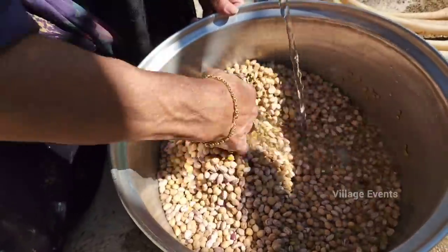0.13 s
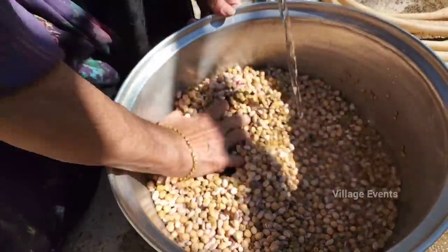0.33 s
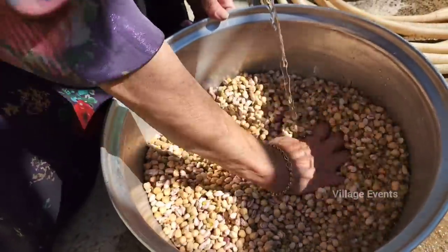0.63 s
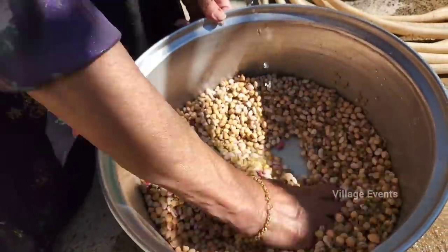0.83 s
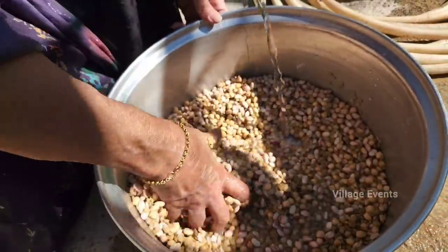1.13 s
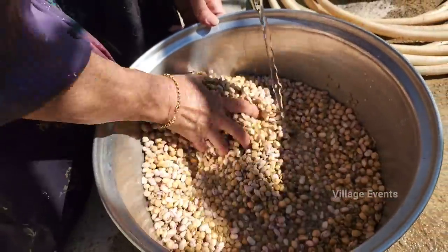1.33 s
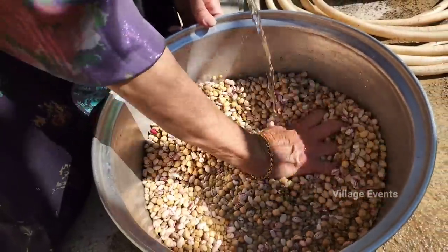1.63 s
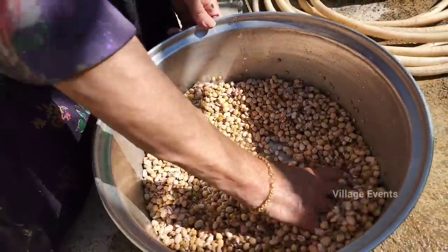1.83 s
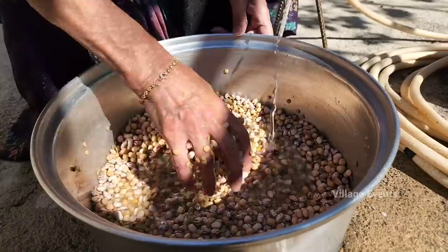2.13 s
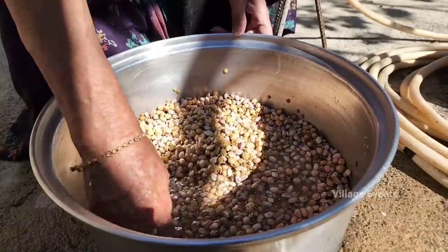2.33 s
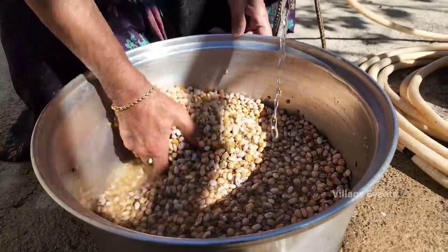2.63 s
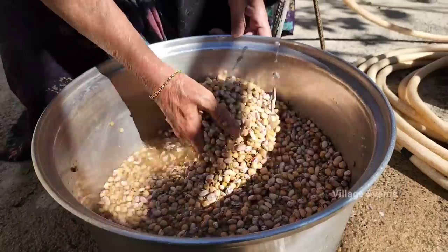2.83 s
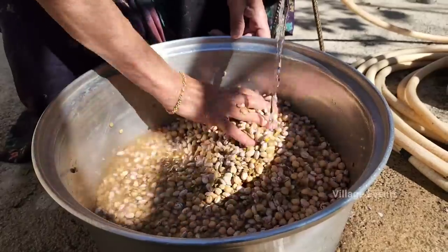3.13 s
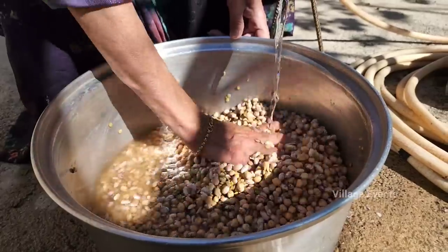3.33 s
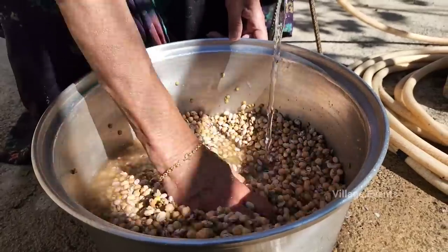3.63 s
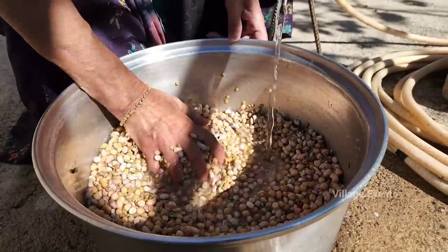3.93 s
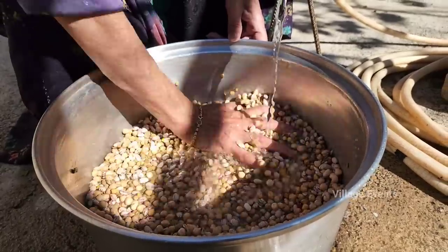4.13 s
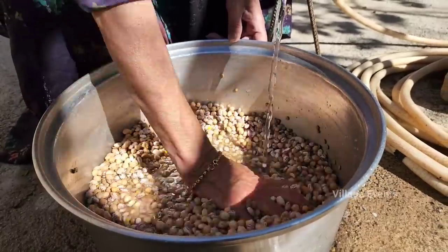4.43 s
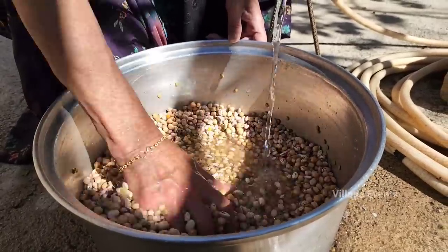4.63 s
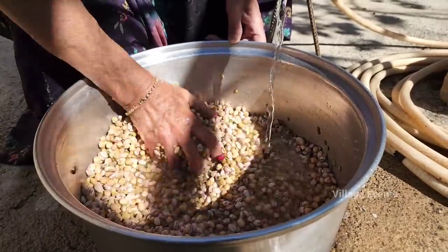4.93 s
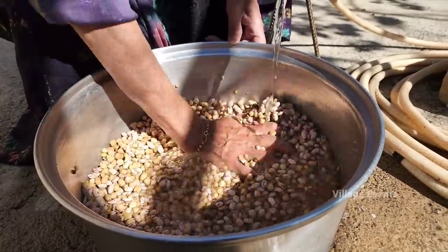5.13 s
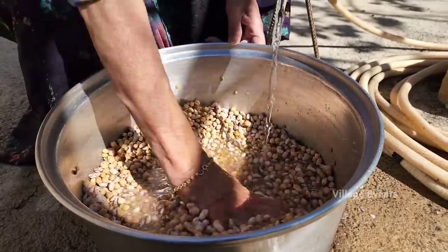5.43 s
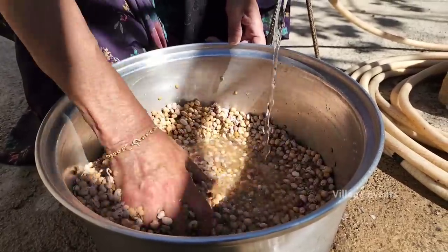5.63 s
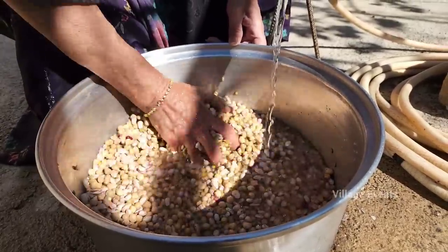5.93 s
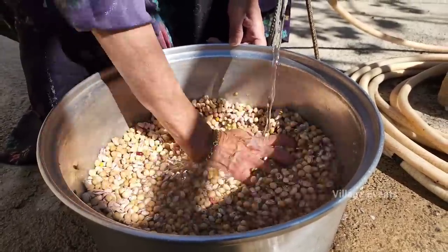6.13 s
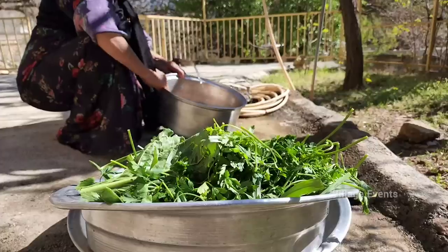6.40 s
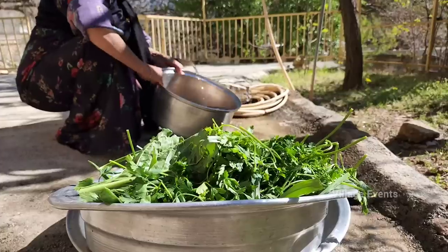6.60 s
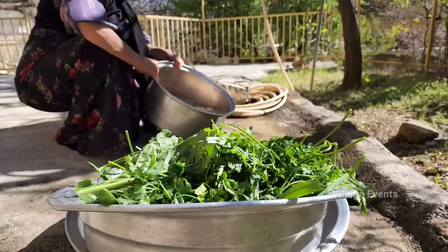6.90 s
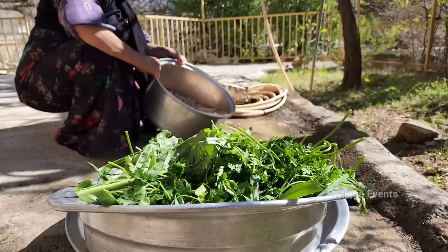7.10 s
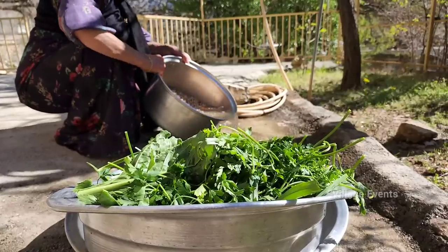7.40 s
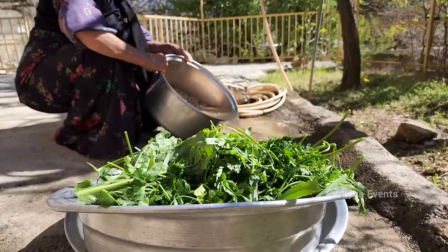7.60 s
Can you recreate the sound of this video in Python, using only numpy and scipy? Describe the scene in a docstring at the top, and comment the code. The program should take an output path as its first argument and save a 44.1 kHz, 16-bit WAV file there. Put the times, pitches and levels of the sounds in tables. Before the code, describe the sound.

Close outdoor sound of wet beans being stirred by hand in a wide metal pot while water falls in. Bright clacks, sharp splats and bubbling come in irregular sweeps. Around two seconds the position changes and the slosh turns more hollow and gurgling. After six seconds, farther away and much quieter, the pot bumps dully on stone with scrape, trickle and drips.

```python
"""Stirring wet beans in a metal pot

A hand stirs dried beans in a wide metal pot while a hose stream falls on them, heard close from two places in turn:
clumped random contacts make the churn and clack, rising damped sines the bubbles, scattered cracks the splats.
Then, from further off, the pot is dragged and tipped on stone: decaying modes give dull knocks, with scrape,
trickle and drips. A light breeze, slow-swelling low noise, buffets the two microphone ports."""
import sys
import numpy as np
from scipy import signal
from scipy.fft import rfft, irfft, next_fast_len
from scipy.io import wavfile
from scipy.ndimage import map_coordinates

SR = 44100
rng = np.random.default_rng(int(sys.argv[2]) if len(sys.argv) > 2 else 0)


def master_out(mix):
    """Clip the mix to full scale and print it as 16-bit PCM to the path in sys.argv[1]."""
    frames = np.transpose(np.atleast_2d(mix))
    ceiling = np.clip(frames, -1, 1)
    pcm = np.round(ceiling * 32767).astype(np.int16)
    wavfile.write(sys.argv[1], SR, pcm)


def volts(x):
    """Linear amplitude factor 10**(x/20) for a level x in dB, scalar or array-like."""
    e = np.asarray(x, float) / 20
    return 10 ** e


N = 342216

# steady stirring, one table for each near place: (time [s], churn level [dB], clack level [dB])
STIRRING_LEVELS = [
    [(0.0, -24, -25.5), (0.2, -29.5, -25.5), (0.4, -25, -27), (0.53, -20, -29), (0.78, -28, -29),
     (0.98, -30, -29.5), (1.3, -24, -18), (1.62, -23.5, -21.5), (1.77, -23, -24), (1.83, -26.5, -25.5),
     (2.022, -29, -26)],
    [(2.026, -37.5, -39), (2.21, -33, -31), (2.33, -46, -41.5), (2.345, -34, -27.5), (2.5, -28, -27.5),
     (2.65, -33.5, -34), (2.74, -29.5, -27), (3.12, -30, -26.5), (3.23, -24, -30), (3.31, -29, -33),
     (3.43, -22.5, -23.5), (3.56, -27.5, -29.5), (3.91, -31, -32.5), (4.16, -24.5, -26), (4.47, -28, -28),
     (4.78, -29, -33), (4.86, -26.5, -28.5), (5.04, -29, -26), (5.16, -22, -25), (5.26, -28.5, -28.5),
     (5.78, -29, -29.5), (6.17, -23.5, -26)],
]
# handfuls of beans tumbling through the stream:
# (start [s], time from start to the fall [s], clack level [dB], spray level [dB])
TUMBLES = [(0.065, 0.027, -26, -32), (0.23, 0.016, -22, -27), (0.265, 0.074, -16.5, -18.5),
           (0.57, 0.097, -20, -26.5), (1.358, .03, -27.5, -23.5), (1.463, 0.044, -16.5, -22),
           (1.647, .02, -28, -29), (1.736, 0.025, -29.5, -30.5), (2.332, .03, -21.5, -28),
           (2.421, .04, -25, -27.5), (2.518, 0.032, -22, -25), (3.09, .06, -35, -27),
           (3.162, 0.035, -17, -20), (4.046, 0.034, -20, -24), (4.113, 0.082, -22.5, -27),
           (4.696, 0.04, -24.5, -38.5), (4.827, .12, -33, -42.5), (5.062, 0.084, -20.5, -28.5),
           (5.828, 0.057, -25, -35.5), (6.052, .03, -27, -43.5)]
# colour of bean on bean: (frequency [Hz], level [dB])
CLACK_COLOUR = [(700, -28), (1800, -10.5), (3000, -3), (4200, 0), (5300, -3.5), (6200, -5.5), (9000, -9.5),
                (16000, -38)]
# colour of flung water: (frequency [Hz], level [dB])
SPRAY_COLOUR = [(1500, -28.5), (4000, -23.5), (6500, 6), (8800, 2), (11000, 8), (15600, 5), (16100, -37.5)]
# resonances of the pot's wall: (frequency [Hz], width [Hz], boost [dB])
WALL_RESONANCES = [(810, 140, 10.5), (1240, 140, 10), (1864, 105, 11.5), (2250, 150, 9.5)]


def unit(x):
    """Scaled to rms 1."""
    return x / np.sqrt(np.mean(x ** 2) + 1e-20)


def along(points, hz):
    """(Hz, value) points read on a log frequency axis."""
    f, v = np.transpose(points)
    return np.interp(np.log(hz + 1), np.log(f + 1), v)


def gains(rows):
    """One gain per sample for each dB column, silent outside the table."""
    s, *columns = np.transpose(rows)
    t = np.arange(N) / SR
    return [volts(np.interp(t, s, column, left=-140, right=-140)) for column in columns]


def wobble(rate):
    """A smooth random curve, rate knots a second."""
    knots = rng.standard_normal(int(N * rate / SR) + 4)
    return map_coordinates(knots, [np.arange(N) * rate / SR])


def coloured(x, spectrum, peaks=()):
    """x through a causal minimum-phase filter with this spectrum and these resonant boosts."""
    m = 2 ** 14
    hz = np.fft.rfftfreq(m, 1 / SR)
    boost_db = sum(db / (1 + (2 * (hz - centre) / width) ** 2) for centre, width, db in peaks)
    level_db = along(spectrum, hz) + boost_db
    # folding the cepstrum forward in time makes the response causal
    cepstrum = irfft(np.log(volts(level_db) + 1e-6), m)
    cepstrum[1:m // 2] *= 2
    cepstrum[m // 2 + 1:] = 0
    response = irfft(np.exp(rfft(cepstrum)), m)
    size = next_fast_len(N + m, True)
    return irfft(rfft(x, size) * rfft(response, size), size)[..., :N]


def placed(start, size, spread_s):
    """Impulses from all over the pot: each reaches one port a little before the other."""
    half_lag = rng.standard_normal(len(start)) * spread_s * SR / 2
    at = np.clip(np.round(start * SR + np.outer([1, -1], half_lag)).astype(int), 0, N - 1)
    return np.array([np.bincount(port, size, N) for port in at])


def rattling(hits, t60, share):
    """Hits plus the quick scatter of their sound round the pot wall, new for every hit."""
    keep = volts(-120 / SR / t60)  # power kept per sample, -60 dB after t60 seconds
    power = signal.lfilter([1 - keep], [1, -keep], hits ** 2)
    return hits + share * np.sqrt(power) * rng.standard_normal((2, N))


def patter(count, scatter_db, clump_db, spread_s):
    """Many small contacts of very unequal size that come in clumps."""
    when, size, sign = rng.random((3, count))
    strength = volts(-scatter_db * np.log(size)) * np.sign(sign - .5)
    hits = placed(when * N / SR, strength, spread_s)
    return hits * volts(clump_db * (wobble(12) + 0.45 * wobble(45) + 1.5 * wobble(150)))


def bubbles(start, hz, db, cycles, spread_s):
    """Damped sines whose pitch rises as the bubble nears the surface."""
    t = np.arange(int(2.5 * cycles * SR / np.percentile(hz, 15))) / SR
    u = hz[:, None] * t / cycles
    tone = np.sin(2 * np.pi * cycles * (u + .03 * u * u))
    envelope = np.exp(-2 * u) * (1 - np.exp(-14 * u))
    song = volts(db)[:, None] * tone * envelope
    half_lag = rng.standard_normal(len(start)) * spread_s * SR / 2
    first = np.round(start * SR + np.outer([1, -1], half_lag)).astype(int).clip(0)
    at = first[..., None] + np.arange(len(t))
    return np.array([np.bincount(port.ravel(), song.ravel(), N + SR)[:N] for port in at])


def swarm(rows, count, spread, cycles):
    """Dense bubbles round one size, which drifts with the hand and the water level."""
    s, hz, db = np.transpose(rows)
    when = rng.uniform(s[0], s[-1], count)
    pitch, size = rng.standard_normal((2, count))
    scattered_hz = np.interp(when, s, hz) * np.exp(spread * pitch)
    pops = bubbles(when, scattered_hz, 2.8 * size, cycles, spread_s=.0002)
    active_share = (s[-1] - s[0]) * SR / N  # keeps the rms right within the active stretch
    return gains(np.transpose([s, db]))[0] * unit(pops) * np.sqrt(active_share)


def breeze():
    """Air tumbling over the ports, unrelated left and right; each gust strikes from one side."""
    # steady wind on both ports: (time [s], level [dB])
    wind = [(0.0, -66), (0.5, -56), (1.95, -50), (2.1, -76), (3.3, -62), (4.5, -71), (6.1, -64),
            (7.0, -66.5), (7.13, -72), (7.76, -75.5)]
    # (time [s], peak level [dB], left minus right [dB])
    gusts = [(0.24, -48.5, -27), (0.46, -48.5, 17), (1.02, -46, -25.5), (1.38, -50.5, -13.5),
             (1.66, -49.5, -27), (1.88, -48, -25), (1.98, -53, -17), (3.5, -53.5, -22),
             (4.12, -46.5, -23.5), (4.88, -57.5, -17), (6.22, -59, -11)]
    # colour of the buffeting: (frequency [Hz], level [dB])
    buffet_colour = [(11, -46), (18, -21.5), (49, 4), (97, -5), (151, -21.5), (200, -9.5), (260, -54.5),
                     (440, -120)]
    swell_db_per_s = 158.5  # rise and fade of a gust
    power, t = gains(wind)[0] ** 2, np.arange(N) / SR
    for s, db, pan_db in gusts:
        sides_db = np.array([[pan_db / 2], [-pan_db / 2]])
        power = power + volts(db - swell_db_per_s * np.abs(t - s) + sides_db) ** 2
    lumps = volts(1.8 * np.array([wobble(11), wobble(4)]))
    rumble = coloured(rng.standard_normal((2, N)), buffet_colour, [(52, 25, 6.7)])
    return np.sqrt(power) * unit(lumps * rumble)


def far_pot():
    """Between knocks the pot scrapes; water runs over its rim and drips into quiet air."""
    # (time [s], scrape level [dB], trickle level [dB])
    far_levels = [(6.172, -39, -55), (6.228, -38, -45), (6.37, -53, -57), (6.498, -40, -47.5),
                  (6.738, -42.5, -49), (6.87, -51, -52.5), (7.012, -47, -67), (7.082, -66, -67),
                  (7.6, -68.5, -71), (7.71, -69, -63), (7.76, -72, -70)]
    # colours of the scrape, the trickle and the quiet air: (frequency [Hz], level [dB])
    scrape_colour = [(24, -50), (40, -8.5), (215, -4), (267, -13.5), (306, -1), (417, -4.5), (616, -16.5),
                     (686, -31.5), (1000, -17), (1300, -48), (2200, -120)]
    trickle_colour = [(350, -19.5), (600, -0.5), (1070, -19), (2270, -4.5), (3080, -10.5), (4400, -8),
                      (5790, -11), (9620, -14.5), (15100, -11.5), (16000, -31)]
    yard_colour = [(150, -33.5), (250, -3.5), (336, 0.5), (597, -7), (1080, -19.5), (2530, -7), (3170, -13),
                   (4410, -10), (9490, -15), (15200, -10), (16000, -15)]
    # (time [s], bubble level [dB], bubble pitch at its start [Hz])
    drips = [(6.2774, -44, 1750), (6.429, -27, 4690), (6.8607, -30.5, 4300), (6.8985, -33, 1840),
             (7.0133, -35.5, 7360), (7.029, -38, 3170), (7.3352, -45, 2580), (7.402, -43.5, 4430),
             (7.6086, -45.5, 3820), (7.6296, -50.5, 1710), (7.6882, -39, 5340), (7.7069, -37.5, 4940),
             (7.7444, -41, 3340)]
    yard_db, tick_db = -60.5, 9.5  # quiet air; drive of a drip's tick over its bubble level
    scrape_gain, trickle_gain = gains(far_levels)
    scrape = patter(count=30000, scatter_db=2, clump_db=.5, spread_s=.0005)
    drops = patter(count=5000, scatter_db=3.5, clump_db=1.0, spread_s=.0004)
    trickle = rattling(drops, t60=.02, share=1.4)
    steady = scrape_gain * unit(coloured(scrape, scrape_colour))
    steady = steady + trickle_gain * unit(coloured(trickle, trickle_colour, WALL_RESONANCES))
    specks = patter(count=30000, scatter_db=2.8, clump_db=.5, spread_s=.001)
    yard = volts(yard_db) * unit(coloured(specks, yard_colour))
    s, db, hz = np.transpose(drips)
    tick_hits = placed(s, volts(db + tick_db), 0.00016)
    tick = coloured(rattling(tick_hits, t60=.035, share=3.5), CLACK_COLOUR)
    return steady + yard + bubbles(s, hz, db, cycles=12, spread_s=0.00022) + tick


def ring(modes, t):
    """One blow: every mode decays by its t60, at a new strength and a slightly new pitch."""
    return sum(volts(db + rng.normal(0, 1.15) - 60 * t / t60) * np.sin(2 * np.pi * hz * (1 + 0.029 * rng.normal()) * t)
               for hz, db, t60 in modes)


def knocks():
    """The heavy pot meets stone softly: a hollow body, a thud, a blurred rattle of the wall and a snap of grit."""
    # (time [s], blow level [dB], thud relative to the blow [dB], wall drive [dB], crushed grit drive [dB])
    bumps = [(6.18, -22.5, -22, -29, -45), (6.217, -16, -16.5, -32, -28.5), (6.287, -38, -12, -40, -45),
             (6.313, -25, -18, -37.5, -45), (6.37, -35, -18, -34.5, -47), (6.408, -29, -10, -36.5, -27),
             (6.434, -18, -22, -30.5, -33), (6.515, -15.5, -15, -30.5, -40), (6.542, -14.5, -20, -31, -32),
             (6.579, -12.5, -20, -28, -40), (6.615, -14.5, -15.5, -29.5, -30.5),
             (6.68, -18, -13.5, -26, -35), (6.748, -23.5, -15, -31.5, -37),
             (6.791, -24, -5.5, -31.5, -30.5), (6.831, -22, -20, -28.5, -34), (6.9, -43, 1, -38, -34),
             (6.941, -34.5, -4, -44.5, -48), (6.976, -26, -9, -39.5, -36.5),
             (7.003, -33.5, -15, -45.5, -37), (7.05, -49, -10, -54, -50)]
    # modes of the pot's body: (mean frequency [Hz], mean level [dB], t60 [s])
    hollow_modes = [(366, 6.5, 0.044), (419.3, -1, 0.075), (582, -11.5, 0.079)]
    # modes of its weight on the ground: (mean frequency [Hz], mean level [dB], t60 [s])
    thud_modes = [(75.4, 2.5, 0.099), (124.4, 3, 0.1), (211.3, 1.5, 0.18)]
    body, t = np.zeros(N + SR), np.arange(SR // 5) / SR
    soft_onset = (1 - np.exp(-t / 0.0039)) ** 2
    for s, db, thud_db, *_ in bumps:
        blow = (ring(hollow_modes, t) + volts(thud_db) * ring(thud_modes, t)) * soft_onset
        body[round(s * SR):][:len(t)] += volts(db) * blow
    s, _, _, wall_db, grit_db = np.transpose(bumps)
    wall = rattling(placed(s, volts(wall_db), .0002), t60=0.15, share=6.6)
    grit = rattling(placed(s, volts(grit_db), 0.00012), t60=.03, share=2.2)
    snaps = coloured(grit, SPRAY_COLOUR)
    wall_colour = [(400, -37), (700, 2.0), (3000, 4), (9000, -22.0)]
    # the body reaches both ports in the same phase, about 1.6 dB louder at the left
    return body[:N] * volts([[.8], [-.8]]) + snaps + coloured(wall, wall_colour, WALL_RESONANCES)


def gurgles(count=70):
    """Larger pockets of air escape from under the beans, among many smaller ones that follow the churn."""
    # the large pockets: (time [s], level [dB], pitch at the start [Hz])
    large = [(2.461, -17, 1130), (3.139, -18, 1120), (3.433, -12.5, 1100), (3.788, -23.5, 540),
             (3.863, -20.5, 538), (4.169, -14.5, 1100), (4.783, -23, 515), (4.818, -19.5, 497),
             (5.029, -25, 530), (5.195, -16, 810), (5.209, -18, 750), (5.635, -17.5, 830)]
    # sizes the pot's air favours: a list of pitches [Hz], each scattered from 7% below to 3% above
    small_hz = (790, 1145, 760, 530)
    s, churn_db, _ = np.transpose(STIRRING_LEVELS[1])
    when, size, pitch = rng.random((3, count))
    when = s[0] + when * (s[-1] - s[0] - .03)
    small_db = np.interp(when, s, churn_db) + 3.5 - 8 * size  # at most 3.5 dB over the churn
    small = when, small_db, np.resize(small_hz, count) * (.93 + .1 * pitch)
    s, db, hz = np.hstack([np.transpose(large), small])
    return bubbles(s, hz, db, cycles=6.3, spread_s=.0001)


def fizz():
    """Fine bubbles under the hand, and the stream drumming a hollow into the shallow water."""
    # bubbles under the hand: (time [s], central pitch [Hz], level [dB])
    swish = [(0.0, 2330, -46.5), (0.25, 3150, -35), (0.5, 2180, -36.5), (0.58, 2690, -27.5),
             (0.82, 2630, -38.5), (1.48, 2870, -32.5), (2.25, 2620, -50), (2.36, 3150, -41),
             (3.13, 2550, -33.5), (3.18, 3170, -19), (3.33, 2400, -41.5), (3.42, 2400, -22.5),
             (3.85, 2000, -51.5), (4.14, 2500, -23.5), (4.64, 2680, -35), (4.8, 2900, -34),
             (4.87, 3450, -23.5), (5.0, 3300, -33), (5.3, 2650, -41), (5.83, 3290, -30.5),
             (6.17, 2350, -35)]
    # hollow under the stream: (time [s], central pitch [Hz], level [dB])
    plunge = [(0.0, 746, -32.5), (0.2, 680, -42), (0.58, 683, -35), (0.72, 620, -37), (0.86, 714, -47),
              (0.97, 810, -38), (1.08, 790, -37), (1.2, 665, -32.5), (1.46, 700, -38.5), (1.58, 618, -31.5),
              (2.02, 800, -52)]
    under_hand = swarm(swish, count=2800, spread=.1, cycles=10)
    return under_hand + swarm(plunge, count=400, spread=.03, cycles=10)


def strays(count):
    """Small landings scattered through every tumble, as rows like those of the splats."""
    s, hold, clack_db, _ = np.transpose(TUMBLES)[..., None]
    when, size, pitch = np.moveaxis(rng.random((len(s), count, 3)), 2, 0)
    db = clack_db + 3.5 + np.log(size)  # at most 3.5 dB over the tumble's clack
    treble_db = -12.5 + 0 * db
    rows = s + when * hold, db, treble_db, 4300 * (.65 + .5 * pitch)
    return np.reshape(rows, (4, -1)).T


def splats():
    """Each landing is a sharp crack with a short scattered tail, a wet treble edge and a few bubbles of its own size."""
    # the loudest single landings of water and beans:
    # (time [s], landing level [dB], treble relative to it [dB], nominal bubble pitch [Hz])
    landings = [(0.2309, -5, -10, 4800), (0.2644, -3, -9.5, 4940), (0.2874, -1, -11, 4760),
                (0.3052, 0, -10.5, 5130), (0.3187, -3, -9.5, 5000), (0.3474, -1.5, -18, 5240),
                (0.5916, -6.5, -9, 4800), (0.627, -8, -12, 4500), (1.3678, -10, -15, 4960),
                (1.4651, -5, -9, 2960), (1.484, -2, -6, 4340), (1.5314, -0.5, -14, 4730),
                (1.5615, -12, -0.5, 5080), (1.6681, -7.5, -5.5, 4970), (2.2775, -25.5, -3, 4680),
                (2.2987, -25, -8.5, 4810), (2.3366, -2.5, -22.5, 3960), (2.359, -7, -22, 3900),
                (2.7152, -12.5, -9, 3250), (2.8504, -21, -15, 2600), (3.0116, -7.5, -16.5, 4870),
                (3.1662, 0, -14, 3840), (3.1798, -2, -16, 3830), (3.2026, -5.5, -10.5, 2450),
                (3.21, -4, -7.5, 4180), (3.7514, -11, -21.5, 1930), (3.936, -20.5, 3, 2740),
                (4.0647, -11, -6, 4950), (4.132, -6.5, -28, 3900), (4.1979, -4, -18, 3170),
                (4.6922, -9, -11, 4200), (4.7324, -7, -16.5, 4970), (4.8564, -7.5, -17, 3420),
                (4.9043, -4.5, -14.5, 3500), (4.9452, -15, -7, 3530), (4.989, -14, -18, 4100),
                (4.998, -7, -17, 4140), (5.0928, -8, -12.5, 4700), (5.1417, -1.5, -11.5, 4400),
                (5.4171, -7, -23, 2680), (5.8326, -6, -16, 3340), (6.0462, -7.5, -10.5, 4900)]
    crack_db, edge_db, trapped_db = 13, 14.5, -4.5  # drive of crack, edge and bubbles over the landing level
    s, db, treble_db, hz = np.vstack([landings, strays(count=2)]).T
    body = rattling(placed(s, volts(db + crack_db), 0.00022), t60=0.019, share=1.84)
    edge = rattling(placed(s, volts(db + treble_db + edge_db), 0.00019), t60=0.028, share=1.52)
    delay, pitch = rng.random((2, len(s), 4))  # four bubbles to a landing
    bubble_start = (s[:, None] + .008 * delay ** 2).ravel()
    bubble_hz = (hz[:, None] * (0.98 + .09 * pitch)).ravel()
    trapped = bubbles(bubble_start, bubble_hz, np.repeat(db + trapped_db, 4), cycles=8.2, spread_s=0.00027)
    return coloured(body, CLACK_COLOUR) + coloured(edge, SPRAY_COLOUR) + trapped


def tumbling():
    """Clack and spray gains of the tumbles: a quick rise, a hold, a steady fall."""
    rise_s, fall_db_per_s = .005, 220
    s, hold, clack_db, spray_db = np.transpose(TUMBLES)[..., None]
    t = np.arange(0, N, 32) / SR - s  # one value per 32 samples
    shape = np.clip(t / rise_s, 0, 1) * volts(-fall_db_per_s * np.clip(t - hold, 0, 1))
    sums = [np.sqrt(np.sum((volts(db) * shape) ** 2, 0)) for db in (clack_db, spray_db)]
    return [np.repeat(gain, 32)[:N] for gain in sums]


def sloshing(x, air):
    """x in the pot's air: moving water and hand make its resonances wander between a lower and a higher tuning."""
    # colour of the churn: (frequency [Hz], level [dB])
    churn_colour = [(70, -28), (130, -20), (200, -19.5), (500, -12.5), (1200, -5), (2200, -3.5),
                    (3500, -5.5), (6000, -16.5), (12000, -42)]
    shift = 0.021  # share of its frequency by which a resonance moves down or up
    turn = np.pi / 4 * (1 + np.tanh(wobble(7)))
    low, high = (unit(coloured(x, churn_colour, [(hz * (1 + k * shift), w, db) for hz, w, db in air]))
                 for k in (-1, 1))
    return unit(np.cos(turn) * low + np.sin(turn) * high)


def stirring():
    """Wet beans churn in the pot's air; each clack of bean on bean also throws spray."""
    # air in the pot as heard from each near place: (mean frequency [Hz], width [Hz], boost [dB])
    pot_air = [
        [(359, 71, 9), (580.8, 12, 14.5), (714, 190, 3), (1830, 300, 2.5)],
        [(208, 22, 9.5), (313.6, 74, 12), (530, 58, 11.5), (771, 123, 11), (1146, 53, 9.5), (1762, 96, 8),
         (2400, 1200, 6.5)],
    ]
    churn = patter(count=30000, scatter_db=1.5, clump_db=-0.7, spread_s=0.00021)
    contacts = patter(count=9000, scatter_db=2.0, clump_db=0.58, spread_s=.0004)
    clack = unit(coloured(rattling(contacts, t60=0.03, share=1.3), CLACK_COLOUR))
    droplets = unit(rattling(contacts, t60=0.0087, share=0.71)) + .4 * rng.standard_normal((2, N))
    flung = patter(count=350, scatter_db=3.0, clump_db=0.5, spread_s=0.0004)  # single drops on the wall
    droplets = droplets + .55 * unit(rattling(flung, t60=.012, share=1.5))
    spray = unit(coloured(droplets, SPRAY_COLOUR))
    tumble_clack, tumble_spray = tumbling()
    out = 0
    for rows, air in zip(STIRRING_LEVELS, pot_air):
        s, churn_db, clack_db = np.transpose(rows)
        spray_db = -36 + 0.9 * (clack_db + 28.5)  # spray follows the clack, 0.9 dB per dB
        levels = np.transpose([s, 0 * s, churn_db, clack_db, spray_db])
        here, churn_gain, clack_gain, spray_gain = gains(levels)  # here: 1 while this place is heard
        wet = sloshing(churn, air)
        clacking = np.hypot(clack_gain, tumble_clack) * clack
        spraying = np.hypot(spray_gain, tumble_spray) * spray
        out = out + churn_gain * wet + here * (clacking + spraying)
    return out


def scene():
    """Near stirring, far knocks, breeze."""
    return stirring() + fizz() + gurgles() + splats() + knocks() + far_pot() + breeze()


def band_limit(x):
    """A steep low-pass at the top of the band."""
    return signal.sosfilt(signal.butter(12, 16410, fs=SR, output="sos"), x)


def record(dry):
    """The microphone ports ring near 5 kHz and differ in colour; the loudest cracks clip."""
    # difference between the ports: (frequency [Hz], left minus right [dB])
    port_colour = [(60, 2), (150, 5), (380, 0.5), (950, 2.0), (2380, 3), (5980, -2), (15000, -1)]
    # the ports' resonance: (frequency [Hz], width [Hz], boost [dB])
    port_resonance = [(4930, 620, 5)]
    left = coloured(dry[0], [(hz, db / 2) for hz, db in port_colour], port_resonance)
    right = coloured(dry[1], [(hz, -db / 2) for hz, db in port_colour], port_resonance)
    mix = np.clip([left, right], -1, 1)
    return band_limit(mix)


dry = scene()
out = record(dry)
master_out(out)
```